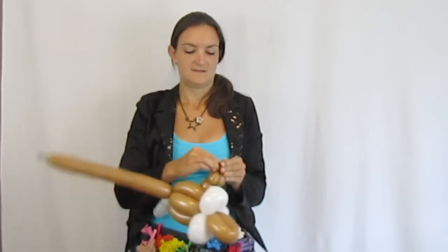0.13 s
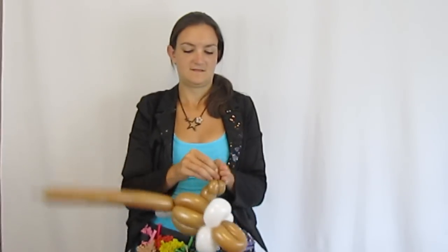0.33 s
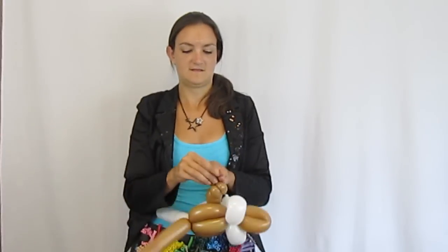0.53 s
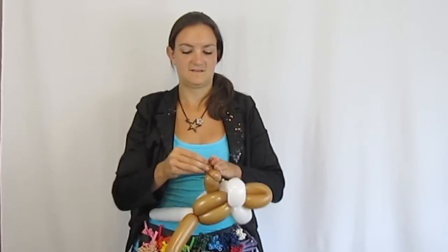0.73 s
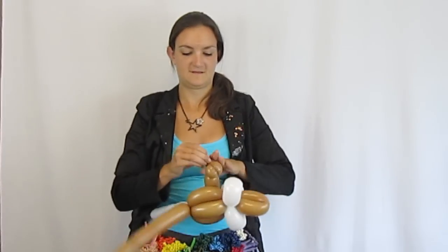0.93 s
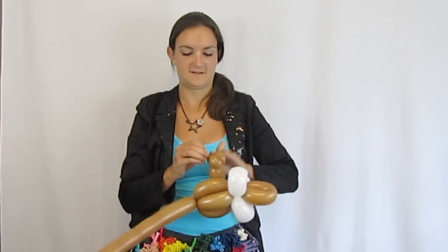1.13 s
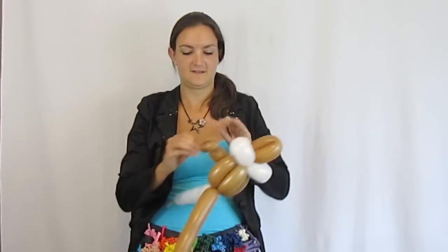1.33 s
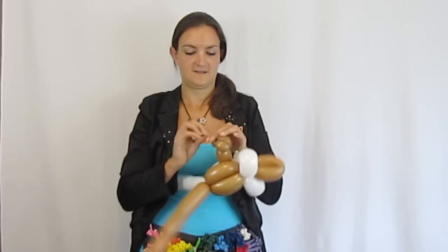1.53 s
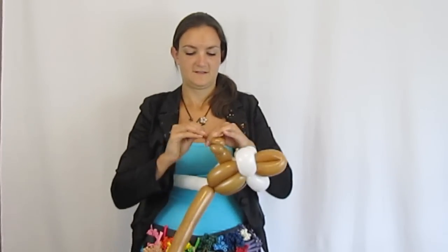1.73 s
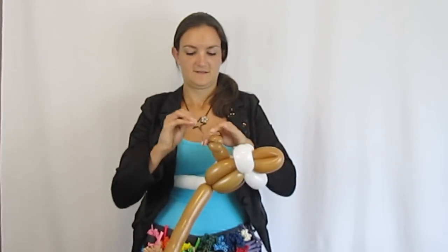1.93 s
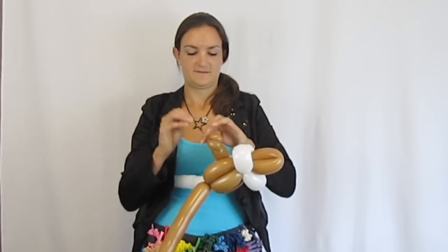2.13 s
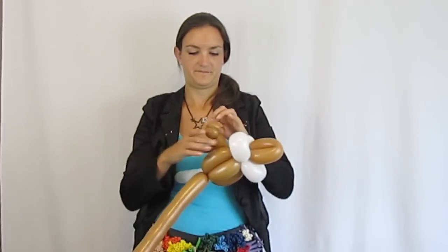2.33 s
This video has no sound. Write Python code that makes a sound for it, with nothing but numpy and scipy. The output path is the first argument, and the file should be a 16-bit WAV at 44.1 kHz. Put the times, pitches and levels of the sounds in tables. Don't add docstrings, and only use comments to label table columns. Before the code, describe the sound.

Dense squeaky rubbing of balloon skin swells, breaks into a tight cluster of loud snaps and one more, then fades to sparse faint squeaks and a bright tick, in a small bare reverberant room, stereo microphone nearby.

```python
import sys
import numpy as np
from scipy import signal
from scipy.fft import rfft, irfft
from scipy.io import wavfile
from scipy.ndimage import uniform_filter1d

SR = 44100
rng = np.random.default_rng(int(sys.argv[2]) if len(sys.argv) > 2 else 0)


def decibels_to_gain(level_db):
    exponent = np.asarray(level_db, float) / 20
    return 10 ** exponent


def waveform_to_disk(signal):
    frames = np.transpose(np.atleast_2d(signal))
    scaled = np.clip(frames, -1, 1) * 32767
    samples = np.round(scaled).astype(np.int16)
    wavfile.write(sys.argv[1], SR, samples)


N = 110250
BINS_HZ = np.fft.rfftfreq(2048, 1 / SR)

# start in seconds, length in seconds, level in dB, skin ring in Hz,
# sheen in dB relative to the skin ring.
STROKES = [(-.05, 0.31, -35, 2190, -9), (0.189, 0.14, -30.5, 2460, -7.5), (0.321, 0.099, -35, 2260, -7.5),
           (0.407, 0.14, -32, 2550, -3.5), (0.522, .13, -31, 2540, -12), (0.627, 0.11, -27.5, 2470, -11),
           (0.691, 0.12, -23.5, 2500, -11.5), (0.816, 0.11, -21, 2195, -12.5),
           (0.931, 0.14, -31.5, 1980, -6), (1.086, 0.071, -28, 1880, -11),
           (1.234, 0.057, -27.5, 1880, -16.5), (1.448, 0.18, -41.5, 2080, -12.5),
           (1.716, 0.048, -56, 1930, -4), (1.835, 0.16, -47.5, 2020, -10), (2.016, .14, -38, 2020, -9),
           (2.192, 0.065, -50, 1900, 9), (2.415, 0.14, -35, 1580, -14)]
# start in seconds, fade to -20 dB in seconds,
# level in dB, skin ring in Hz, sheen in dB relative to the skin ring.
RECOILS = [
    (1.04, .09, -22, 2160, -18.5),
    (1.204, 0.01, -24, 1780, -13.5),
]
# time in seconds, peak in dB, ring in Hz, crack in dB relative to the ring.
SNAPS = [
    (1.0393, -2, 2080, -21.5),
    (1.0504, -8, 1880, -29),
    (1.0704, -7, 1890, -25),
    (1.2019, -3, 1985, -13),
    (1.289, -19, 1880, -31),
    (1.8432, -39, 2180, -11),
    (2.0312, -31.5, 2400, -5),
    (2.0614, -35, 1990, -7),
]
# time in seconds, peak in dB, centre in Hz.
TICKS = [(.022, -28, 8000), (.055, -20, 6960), (.124, -33, 9000), (.413, -20.5, 9000), (.432, -21, 9000),
         (.985, -26, 8950), (1.041, -20, 14000), (1.202, -27, 13000), (1.729, -44, 7000),
         (2.199, -15.5, 10800), (2.208, -19, 9900)]
# start in seconds, length in seconds, level in dB, pitch in Hz, roughness 0 to 1.
GROANS = [(.0, .1, -42, 260, 0.8), (0.222, .12, -39.5, 332, 0.97), (0.691, 0.15, -38.5, 467, 0.51),
          (.7, .12, -40.5, 740.4, 0.47), (.8, 0.096, -42, 433, 0.23), (1.196, .04, -34, 611, .4),
          (1.21, 0.067, -36, 1050, .8), (2.087, 0.067, -37, 485, 0.13), (2.13, 0.07, -38, 460.4, .08),
          (2.185, 0.048, -45, 499, 0.22), (2.23, 0.045, -50, 500, 0.26), (2.455, 0.041, -43, 403, 0.84),
          (2.455, 0.056, -44, 850, 0.74)]
# frequency in Hz, gain in dB.
MIC_RESPONSE = [(100, -9), (1000, 2.5), (2900, -1.5), (4150, -5), (4900, 4.5), (9000, -1), (12500, -2),
                (16000, -24)]
# frequency in Hz, gain in dB.
SCATTER = [(300, -13), (1000, -20), (3000, -16.5), (6000, -11), (12000, 1)]
# frequency in Hz, time to fall by 60 dB in seconds.
ROOM_T60 = [(250, 0.4), (1000, 0.62), (2500, .5), (6000, 0.5), (12000, 0.37)]
# frequency in Hz, likeness 0 to 1.
LIKENESS = [(60, 0.61), (200, 0.087), (600, .85), (2000, 0.92), (5000, 0.68), (9000, 0.27), (13000, 0.042)]
# time in seconds, rumble in dB.
SWING = [(0.0, -51), (0.02, -51.5), (1.02, -48), (1.04, -46), (1.09, -60), (1.38, -79), (2.42, -55),
         (2.5, -56)]
# frequency in Hz, density in dB per Hz.
RUMBLE = [(20, -29), (60, -8), (100, -4), (200, -9), (320, 2), (600, -30)]
# frequency in Hz, density in dB per Hz.
AIR = [(25, -21), (243, -3), (800, -7.5), (2800, -10), (4150, -19), (5200, -16.5), (10000, -28),
       (15000, -66)]


def rubbing():
    slips_per_s, spread_db = 2500, 2.5
    size = decibels_to_gain(spread_db * np.minimum(rng.exponential(1, N + SR), 3))
    slips = (rng.random(N + SR) < slips_per_s / SR) * size * rng.choice([-1., 1.], N + SR)
    out = np.zeros(N)
    for start, length, level_db, hz, sheen_db in STROKES:
        effort = arch(length)
        drive = slips[round((start + .1) * SR):][:len(effort)]
        add(out, start, decibels_to_gain(level_db) * effort * scrape(drive, hz, sheen_db, body_db=-10.5))
    t = np.arange(SR // 4) / SR
    for start, fade_s, level_db, hz, sheen_db in RECOILS:
        drive = slips[round((start + 1) * SR):][:len(t)]
        add(out, start, decibels_to_gain(level_db - 20 * t / fade_s) * scrape(drive, hz, sheen_db, body_db=-23))
    return out


def scrape(slips, hz, sheen_db, body_db):
    skin = bell(hz, 1365, 0)
    under = bell(hz * 0.564, 1170, -9.5)
    sheen = bell(6000, 3930, sheen_db)
    body = bell(477, 710, body_db)
    return evened(causal(slips, np.sqrt(skin + under + sheen + body)))


def snaps():
    out = np.zeros(N)
    for s, peak_db, hz, crack_db in SNAPS:
        blow = release(1500, fade_s=0.0071, chatter_db=-19.5)
        ring = peaked(resonate(blow, hz, 1020))
        crack = peaked(resonate(blow, 7500, 3000))
        add(out, s, decibels_to_gain(peak_db) * (ring + decibels_to_gain(crack_db) * crack))
    return out


def ticks():
    out = np.zeros(N)
    for s, peak_db, hz in TICKS:
        blow = release(2500, fade_s=0.015, chatter_db=-33)
        add(out, s, decibels_to_gain(peak_db) * peaked(resonate(blow, hz, 8800)))
    return out


def release(size, fade_s, chatter_db):
    t = np.arange(size) / SR
    chatter = rng.standard_normal(size) ** 3 * np.exp(-t / fade_s)
    return (t == 0) + decibels_to_gain(chatter_db) * chatter


def groans():
    tilt_db, sag, wobble_depth = -15, 0.051, 0.094
    out = np.zeros(N)
    for start, length, level_db, hz, rough in GROANS:
        effort = arch(length)
        noise = rng.standard_normal((2, len(effort)))
        wobble = evened(uniform_filter1d(noise[0], 200))
        glide = 1 - sag * np.linspace(-1, 1, len(effort)) + wobble_depth * rough * wobble
        turns = np.cumsum(hz * glide) / SR
        tone = sum(decibels_to_gain(tilt_db * k) * np.sin(2 * np.pi * (k + 1) * turns) for k in range(5))
        blur = evened(resonate(noise[1], hz, hz * 0.97))
        blend = np.sqrt(1 - rough) * evened(tone) + np.sqrt(rough) * blur
        add(out, start, decibels_to_gain(level_db) * effort * blend)
    return out


def scattered(balloons):
    taps = rng.standard_normal(400) * np.exp(-np.arange(400) / SR / .0015)
    smear = np.convolve(balloons, taps / np.linalg.norm(taps))[:N]
    side = causal(smear, decibels_to_gain(read(SCATTER, BINS_HZ)))
    return np.array([side, -side])


def room(x):
    gap_s, handover_s, size, spacing = .003, .05, 24000, 20
    out = np.zeros((2, N))
    turn = np.arange(N) / SR / handover_s
    for k in range(3):
        taps = np.zeros((2, size))
        at = np.arange(0, size, spacing) + rng.integers(0, spacing, (2, size // spacing))
        np.put_along_axis(taps, at, rng.choice([-1., 1.], at.shape), 1)
        taps[:, :round(gap_s * SR)] = 0
        hz, t, z = signal.stft(pair(*taps), SR, nperseg=256)
        decay = decibels_to_gain(-60 * t / read(ROOM_T60, hz)[:, None])
        tail = signal.istft(z * decay, SR, nperseg=256)[1]
        tail = tail / np.linalg.norm(tail[0])
        share = np.sqrt(2 / 3) * np.cos(np.pi * (turn - k) / 3)
        out += signal.fftconvolve((share * x)[None], tail, axes=1)[:, :N]
    return out


def background():
    t = np.arange(N) / SR
    hum = decibels_to_gain(-1) * np.sin(2 * np.pi * 117.8 * t + np.array([[0], [1.5]]))
    swing = decibels_to_gain(np.interp(t, *np.transpose(SWING)))
    low = swing * (coloured(RUMBLE) + hum) + decibels_to_gain(-66) * hum
    u = np.maximum(t - 1.040, 0) / 0.0019
    puff = decibels_to_gain(-28.5) * np.outer([1, .6], u * (2 - u) * np.exp(-u))
    return decibels_to_gain(-49.5) * coloured(AIR) + low + puff


def coloured(spectrum):
    x = pair(*rng.standard_normal((2, N)))
    return evened(irfft(rfft(x) * decibels_to_gain(read(spectrum, np.fft.rfftfreq(N, 1 / SR))), N))


def pair(a, b):
    same = read(LIKENESS, np.fft.rfftfreq(len(a), 1 / SR))
    mid = rfft(a) * np.sqrt((1 + same) / 2)
    side = rfft(b) * np.sqrt((1 - same) / 2)
    return irfft(np.array([mid + side, mid - side]), len(a))


def resonate(x, hz, width_hz):
    b, a = signal.iirpeak(hz, hz / width_hz, SR)
    return signal.lfilter(b, a, signal.lfilter(b, a, x))


def bell(hz, width_hz, db):
    f = BINS_HZ + 1
    shape = (1 + ((f - hz * hz / f) / width_hz) ** 2) ** -2
    return decibels_to_gain(2 * db) * shape / shape.sum()


def causal(x, gain):
    log_gain = np.log(np.r_[gain, gain[-2:0:-1]] + 1e-5)
    phase = -signal.hilbert(log_gain).imag[:len(gain)]
    taps = irfft(gain * np.exp(1j * phase))
    return signal.fftconvolve(x, taps[:1024])[:len(x)]


def arch(length):
    u = np.arange(round(length * SR)) / (length * SR)
    return np.sin(np.pi * u)


def evened(x):
    return x / np.sqrt(np.mean(x ** 2) + 1e-20)


def peaked(x):
    return x / abs(x).max()


def read(points, hz):
    f, value = np.transpose(points)
    return np.interp(np.log(hz + 1), np.log(f + 1), value)


def add(mix, s, sound):
    at = round(s * SR)
    part = mix[max(at, 0):][:len(sound) + min(at, 0)]
    part += sound[max(-at, 0):][:len(part)]


def scene():
    sources = rubbing() + snaps() + ticks() + groans()
    balloons = causal(sources, decibels_to_gain(read(MIC_RESPONSE, BINS_HZ)))
    return balloons + scattered(balloons) + decibels_to_gain(-0.5) * room(balloons) + background()


def roll_off(x):
    return signal.sosfilt(signal.butter(12, 16400, fs=SR, output="sos"), x)


def record(dry):
    left_db = 0.37
    mix = dry * decibels_to_gain([[left_db], [-left_db]])
    return roll_off(mix)


dry = scene()
out = record(dry)
waveform_to_disk(out)
```